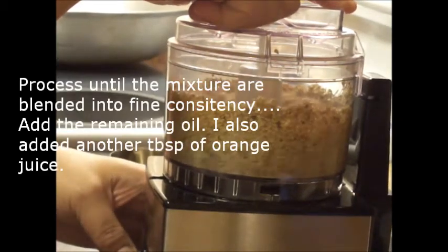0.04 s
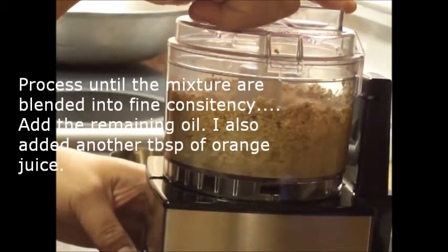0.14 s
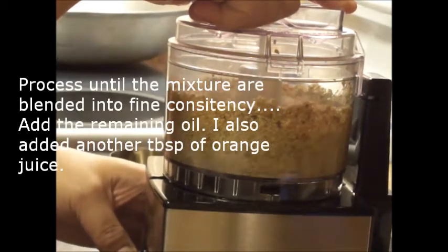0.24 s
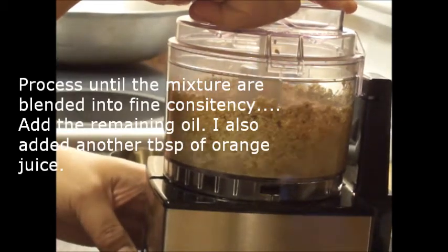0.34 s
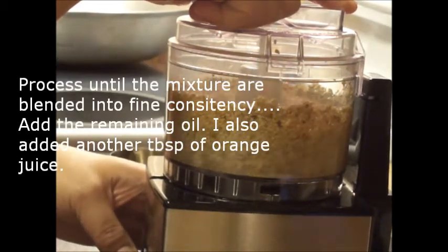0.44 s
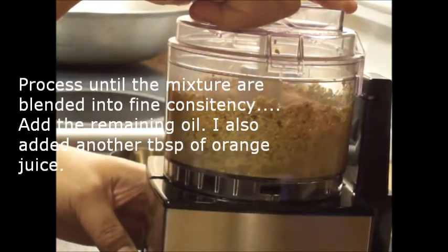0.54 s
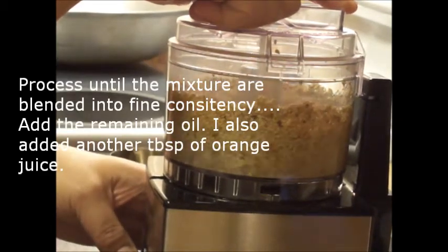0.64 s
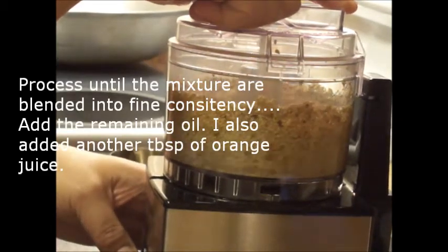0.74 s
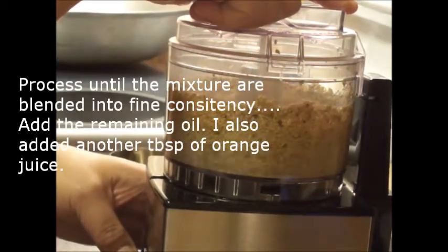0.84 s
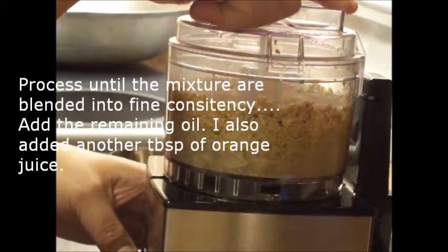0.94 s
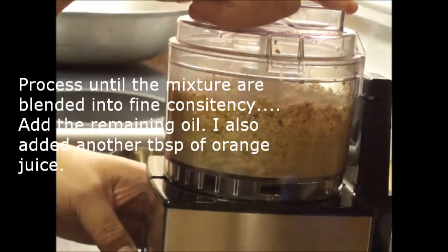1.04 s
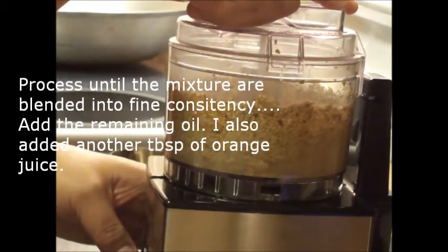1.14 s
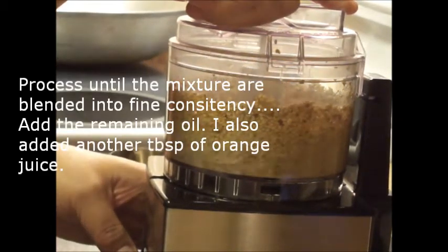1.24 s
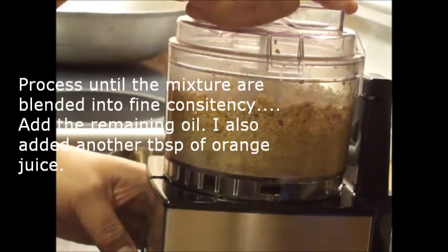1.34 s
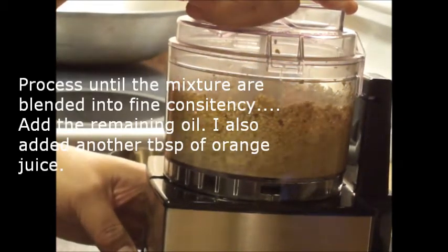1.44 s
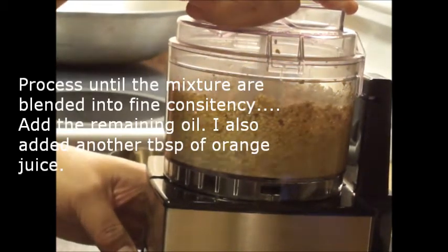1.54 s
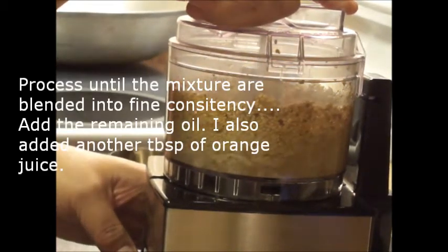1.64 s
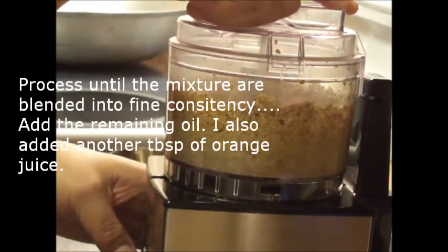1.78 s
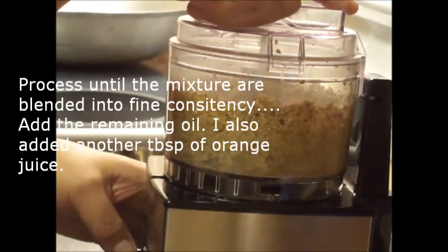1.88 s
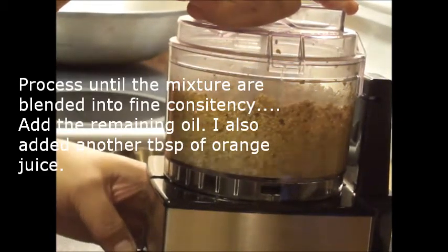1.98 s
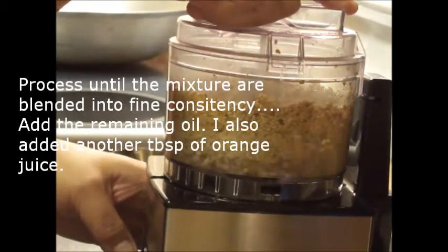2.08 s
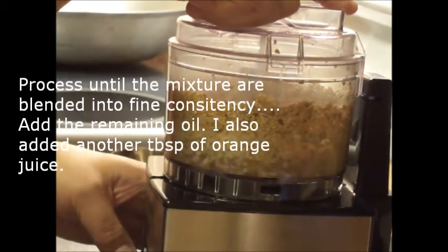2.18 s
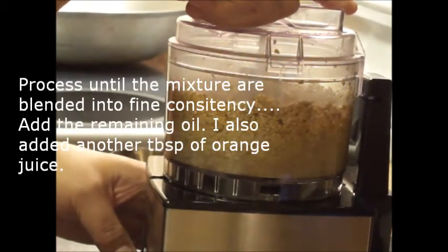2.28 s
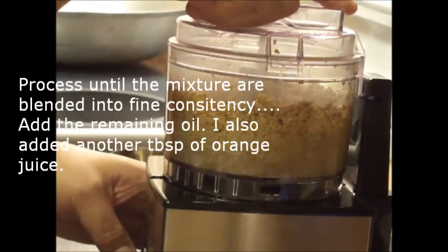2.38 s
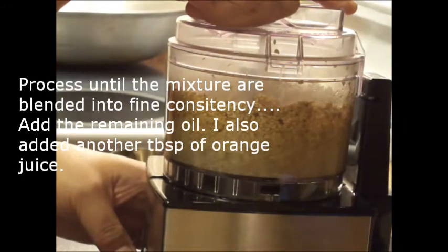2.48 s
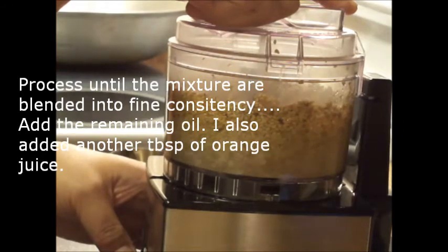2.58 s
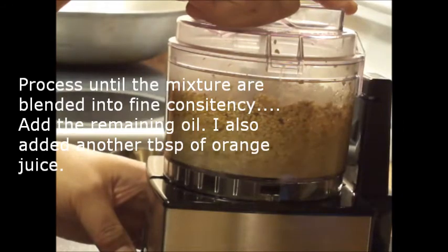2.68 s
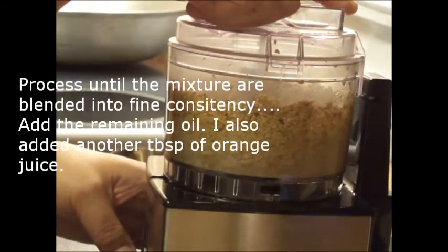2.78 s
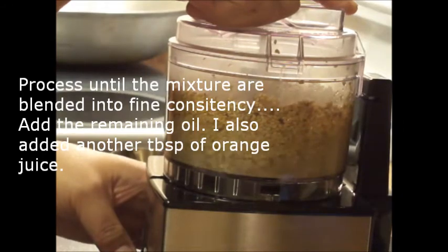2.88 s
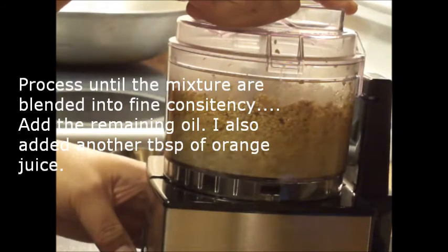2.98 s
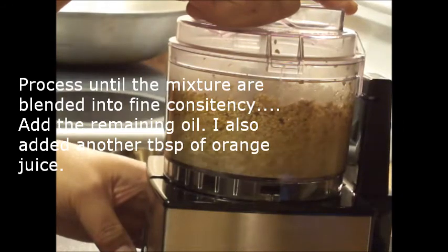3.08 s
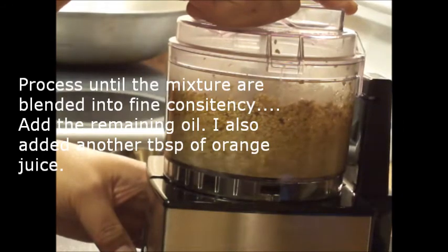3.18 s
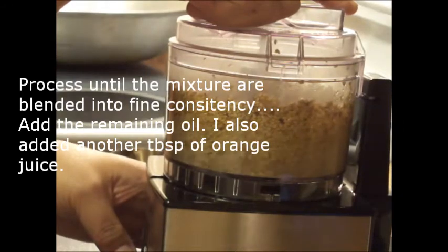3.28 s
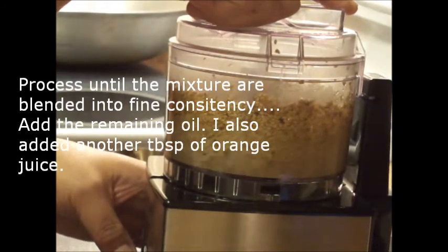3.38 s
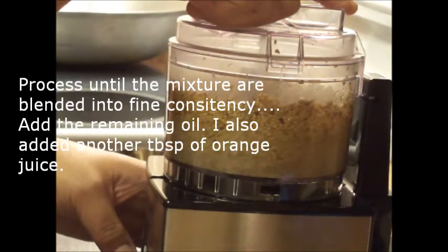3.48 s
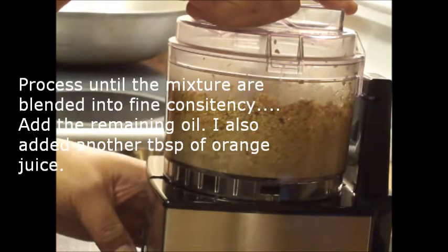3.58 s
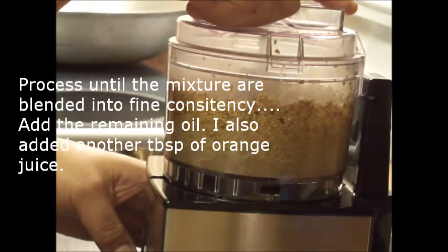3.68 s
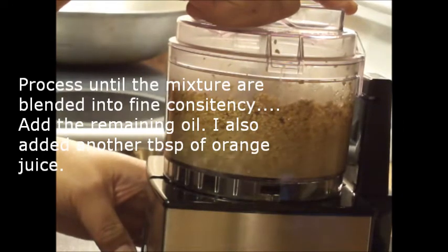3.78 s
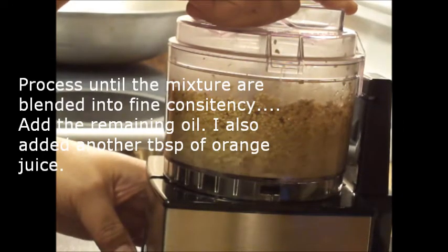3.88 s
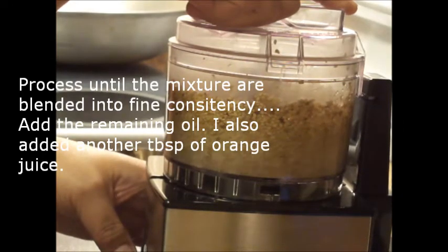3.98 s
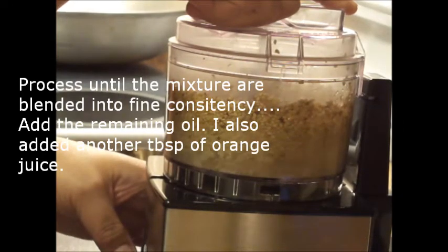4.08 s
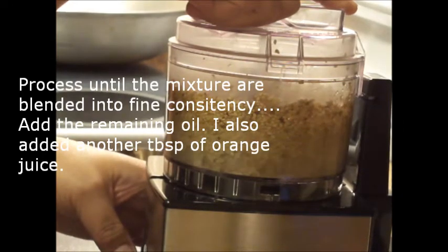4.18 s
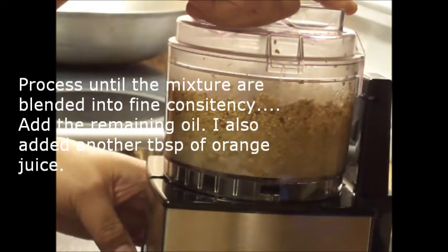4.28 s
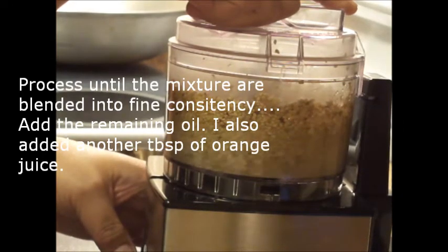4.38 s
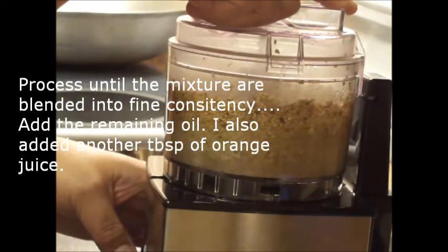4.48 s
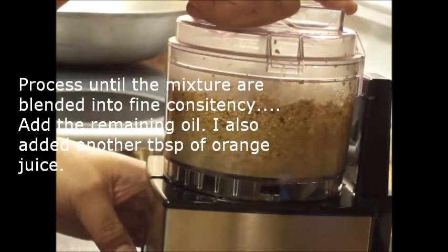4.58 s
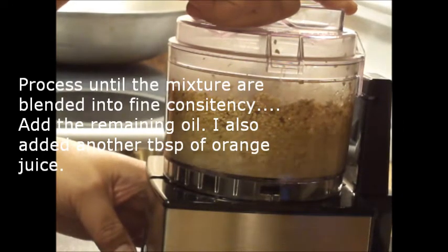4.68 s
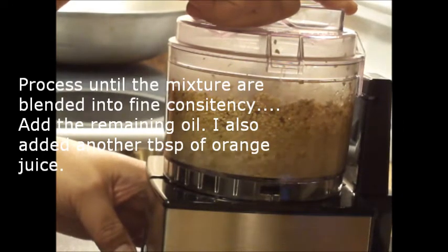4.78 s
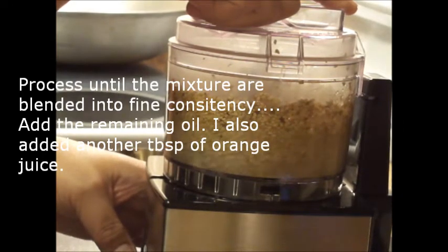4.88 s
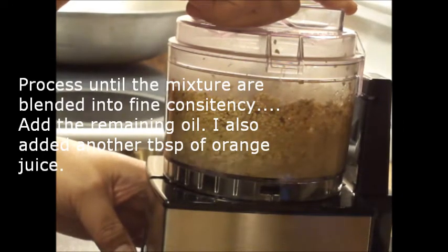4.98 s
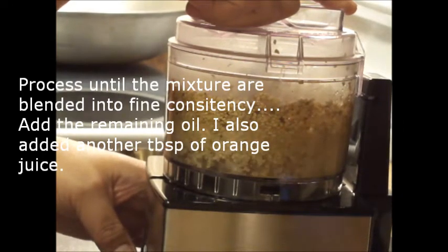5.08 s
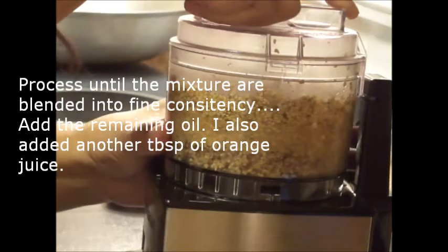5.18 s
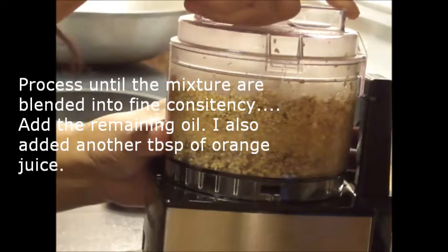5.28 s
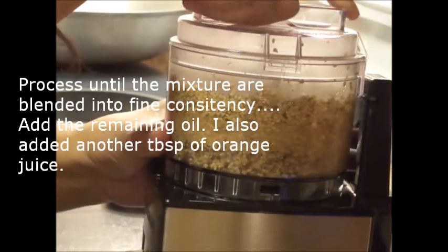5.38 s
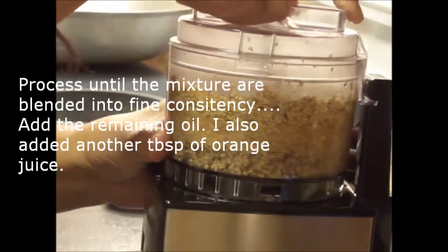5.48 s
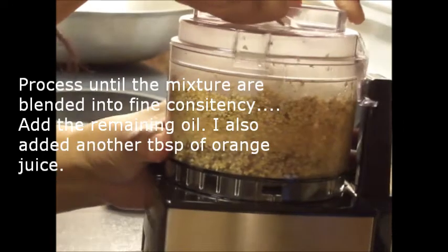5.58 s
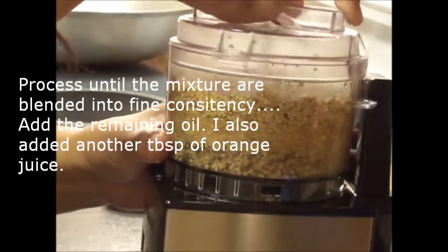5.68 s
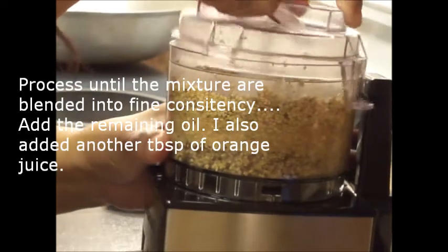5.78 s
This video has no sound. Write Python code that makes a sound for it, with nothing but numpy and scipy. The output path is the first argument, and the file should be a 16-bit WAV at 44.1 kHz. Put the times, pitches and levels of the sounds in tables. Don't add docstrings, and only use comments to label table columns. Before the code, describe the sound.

A mains-powered chopper whirs and crunches through dry seeds on a counter, throbbing and crackling irregularly. A brief run-down, a sharp switch click, then a second burst, strained at first, then faster, then slightly lower, all sinking gradually in level. A tiny silent gap follows, then quiet room hiss, light plastic ticks and a hard lid clack with a short rattle. Close, thin in the bass, with slight indoor reflections.

```python
import sys
import numpy as np
from scipy import signal
from scipy.fft import rfft, irfft, next_fast_len
from scipy.io import wavfile
from scipy.ndimage import map_coordinates

SR = 44100
rng = np.random.default_rng(int(sys.argv[2]) if len(sys.argv) > 2 else 0)


def ratio_of_db(decibels):
    return 10 ** (np.asarray(decibels, float) / 20)


def materialize(psi):
    bounded = np.clip(np.atleast_2d(psi).T, -1, 1)
    quanta = np.round(bounded * 32767).astype(np.int16)
    wavfile.write(sys.argv[1], SR, quanta)


N = 257103
FADE_END_S, CUT_S = 5.226, 5.243
FREE_SPEED = 145

# [s, 1/s].
WORKING_SPEED = [(0, 143.2), (2, 144), (2.25, 144), (2.32, 126), (2.5, 124), (2.64, 123.5), (2.7, 133),
                 (2.92, 137.8), (3.3, 139), (3.6, 138.5), (4.0, 133.5), (4.3, 132.6), (5, 132.6)]


def unit(x):
    return x / np.sqrt(np.mean(x ** 2) + 1e-20)


def along(points, hz):
    f, v = np.transpose(points)
    return np.interp(np.log(hz + 1), np.log(f + 1), v)


def curves(rows):
    s, *cols = np.transpose(rows)
    return [np.interp(np.arange(N) / SR, s, c) for c in cols]


def wobble(rate):
    knots = rng.standard_normal(int(N * rate / SR) + 4)
    return map_coordinates(knots, [np.arange(N) * rate / SR])


def filtered(x, response):
    m = next_fast_len(N + SR // 2)
    return irfft(rfft(x, m) * response(np.fft.rfftfreq(m, 1 / SR)), m)[..., :N]


def coloured(x, spectrum):
    return unit(filtered(x, lambda hz: ratio_of_db(along(spectrum, hz))))


def modes(table):
    return lambda f: 1 + sum(ratio_of_db(db) * 1j * f * w / (c * c - f * f + 1j * f * w) for c, w, db in table)


def drive():
    # [s, s].
    switch = [
        (-2, 1.98),
        (2.319, 5.02),
    ]
    # [s, dB].
    seed_load = [(0, -41), (.3, -40.5), (1, -41), (1.9, -41), (2.45, -38.5), (2.9, -39.5), (3.4, -39.5),
                 (4, -39.5), (4.5, -37.5), (5, -37)]
    spin_up_s, coast_s, friction = .055, .25, .41
    t = np.arange(N) / SR
    share, powered = np.zeros(N), np.zeros(N, bool)
    for on, off in switch:
        up, down = np.clip(t - on, 0, None), np.clip(t - off, 0, None)
        rise = 1 - np.exp(-up / spin_up_s)
        share += rise * np.clip((1 + friction) * np.exp(-down / coast_s) - friction, 0, 1)
        powered |= (t >= on) & (t < off)
    lag = 1 - share
    speed = share * curves(WORKING_SPEED)[0]
    fade_db = 20 * np.log10(np.clip(1 - t / 5.297, 1e-5, 1))
    loss_db = np.where(powered, 22.5, 41) * lag ** 2.59
    grind_db = curves(seed_load)[0] + fade_db - loss_db
    strain_db = np.where(powered, 6, 5.5) * np.tanh((1 - speed / FREE_SPEED) / .18)
    whine_db = -5 + strain_db - 32 * lag ** 4
    rumble_db = -13 + np.where(powered, 12.5, 5.5) * lag
    return speed, grind_db, whine_db, rumble_db


def jams():
    # [s, dB].
    early = [(0.0018, 5.5), (0.0218, 7.5), (0.029, 5.4), (0.0574, 4.1), (0.0732, 5.5), (0.0893, 6.5),
             (0.1082, 7.0), (0.1161, 4.4), (0.1229, 5.0), (0.1556, 5.8), (0.1726, 8.0), (0.1866, 5.9),
             (0.1925, 9.0), (0.2059, 5.5), (0.2224, 6.3), (0.2351, 9.2), (0.241, 4.2), (0.2481, 3.9),
             (0.2565, 7.0), (0.2753, 3.9), (0.2875, 6.4), (0.3052, 4.4), (0.3107, 4.8), (0.3243, 7.0),
             (0.3544, 5.2), (0.3673, 7.0), (0.3882, 7.9), (0.4016, 8.5), (0.4077, 6.9), (0.451, 7.1),
             (0.458, 6.1), (0.4719, 9.7), (0.4909, 4.3), (0.5016, 4.8), (0.5068, 5.0), (0.5215, 5.4),
             (0.5281, 5.3), (0.5358, 6.8), (0.5413, 5.6), (0.5698, 5.7), (0.6052, 5.6), (0.6243, 7.9),
             (0.6673, 4.5), (0.6884, 9.3), (0.7084, 4.5), (0.7234, 8.4), (0.7313, 5.7), (0.7372, 5.0),
             (0.751, 3.9), (0.7721, 8.2), (0.7812, 3.9), (0.8052, 5.6), (0.824, 9.1), (0.8342, 3.9),
             (0.8392, 4.1), (0.8551, 3.9), (0.8737, 7.9), (0.8923, 4.2)]
    late = [(0.9218, 6.8), (0.9567, 6.1), (1.0057, 5.8), (1.0272, 4.7), (1.034, 4.8), (1.042, 4.7),
            (1.0707, 5.2), (1.0821, 5.1), (1.1388, 5.8), (1.156, 5.0), (1.1728, 5.4), (1.2215, 6.9),
            (1.2392, 5.5), (1.256, 8.4), (1.2762, 4.7), (1.2839, 7.6), (1.2907, 5.3), (1.2984, 4.9),
            (1.3399, 4.8), (1.4168, 5.0), (1.4365, 5.7), (1.4569, 5.1), (1.4712, 6.1), (1.4925, 7.4),
            (1.5039, 6.1), (1.5118, 5.1), (1.5206, 6.9), (1.5293, 4.8), (1.5406, 7.7), (1.5546, 7.5),
            (1.6161, 5.2), (1.6245, 6.0), (1.6549, 4.8), (1.6669, 5.8), (1.6896, 5.4), (1.7007, 6.2),
            (1.7063, 5.1), (1.7181, 6.8), (1.7544, 8.8), (1.763, 6.7), (1.7887, 9.3), (1.7968, 7.7),
            (1.8029, 5.0), (1.8229, 5.2), (1.8501, 5.8), (1.8578, 4.9), (1.8714, 6.3), (1.8925, 6.2),
            (1.9, 5.7), (1.9247, 7.7), (1.9336, 5.1), (1.9417, 4.9), (1.9546, 5.8), (1.971, 8.0),
            (1.9828, 6.3), (1.9959, 6.9), (2.0039, 7.2), (2.0122, 7.5)]
    again = [(2.4224, 8.7), (2.4315, 7.4), (2.4374, 6.7), (2.4585, 10.3), (2.4744, 8.0), (2.4943, 7.1),
             (2.5043, 6.6), (2.5229, 4.3), (2.5374, 7.2), (2.549, 5.3), (2.5746, 6.9), (2.5887, 4.8),
             (2.615, 4.9), (2.654, 6.4), (2.676, 6.7), (2.6844, 4.2), (2.6909, 5.8), (2.7009, 6.2),
             (2.7075, 10.1), (2.7234, 4.4), (2.7374, 4.6), (2.7526, 7.7), (2.7748, 6.4), (2.8256, 4.2),
             (2.8494, 5.4), (2.8717, 5.9), (2.9188, 4.1), (2.9238, 5.7), (2.9372, 5.5), (2.9451, 4.2),
             (2.9499, 5.0), (2.9574, 7.9), (2.9798, 6.1), (2.9887, 6.0), (2.9946, 5.1), (3.0009, 7.5),
             (3.0227, 9.2), (3.0673, 4.5), (3.09, 7.4), (3.0948, 4.9), (3.1612, 4.4), (3.1694, 4.3),
             (3.2395, 6.1), (3.2551, 4.2), (3.2619, 6.2), (3.2678, 6.2), (3.2728, 4.1), (3.29, 5.2),
             (3.3188, 4.6), (3.3263, 5.1), (3.3333, 8.3), (3.3383, 5.2), (3.356, 7.5), (3.3696, 4.1),
             (3.4145, 4.4), (3.4281, 5.1), (3.4336, 5.1), (3.4549, 5.3)]
    last = [(3.5209, 5.5), (3.5381, 6.7), (3.5732, 6.1), (3.6036, 7.6), (3.6524, 5.6), (3.6705, 5.7),
            (3.6998, 5.0), (3.7073, 7.1), (3.7224, 5.6), (3.7655, 5.4), (3.7839, 5.2), (3.8324, 5.1),
            (3.8546, 5.8), (3.8689, 6.6), (3.9215, 9.1), (3.9367, 8.7), (3.9669, 6.2), (3.9905, 6.1),
            (4.0238, 11.8), (4.042, 5.1), (4.0918, 5.3), (4.1102, 5.6), (4.1546, 5.7), (4.1844, 5.6),
            (4.1918, 9.2), (4.2014, 6.6), (4.2728, 7.0), (4.2912, 6.1), (4.344, 6.8), (4.3485, 5.6),
            (4.3553, 5.2), (4.4351, 5.9), (4.456, 8.5), (4.4873, 5.2), (4.5023, 5.2), (4.5234, 6.8),
            (4.5624, 5.6), (4.607, 6.0), (4.6302, 6.8), (4.6392, 7.1), (4.6458, 5.4), (4.6549, 6.4),
            (4.6728, 5.7), (4.7574, 8.7), (4.7866, 6.2), (4.8032, 10.0), (4.8093, 6.0), (4.8184, 6.2),
            (4.8404, 8.4), (4.8721, 7.4), (4.9063, 7.3), (4.9172, 6.7), (4.9222, 5.2), (4.9404, 5.4),
            (4.9556, 5.6), (4.9744, 10.1), (4.9828, 7.0), (4.99, 8.1)]
    jolt_gain, half_s = 1.5, 0.0015
    bump_db, t = np.zeros(N), np.arange(N) / SR
    for s, db in [*early, *late, *again, *last]:
        near = slice(max(round(s * SR) - 300, 0), round(s * SR) + 300)
        bump_db[near] += jolt_gain * db * np.exp(-((t[near] - s) / half_s) ** 2)
    return ratio_of_db(bump_db)


def processor():
    # [Hz, Hz, dB].
    case_modes = [(445, 53, -3), (572, 45, 1.5), (869, 52, 4), (1547, 75, 2), (1763.4, 28.6, 8.5),
                  (1966, 250, 3), (2110, 24, 4.5), (2250, 110, -9), (2687, 67, 1), (3130, 140, -4.5),
                  (3420, 160, 1.5), (3590, 40, -0.5), (3650, 120, -2), (5090, 100, -2), (5570, 71, -4.5),
                  (9310, 110, -16)]
    # [Hz, Hz, share].
    case_dips = [(1646, 32, 0.08), (2197, 74, 0.47), (2560, 83, 0.29), (3740, 52, 0.2)]
    # [1, dB].
    tooth_tones = [(1, -1.5), (2, -1.5), (3, -7.5)]
    # [s, dB].
    sing_level = [(0, -28), (2.0, -28), (2.05, -40), (2.62, -40), (2.72, -13), (3.3, -14), (4, -16),
                  (4.9, -19), (5.02, -40)]
    # [Hz, dB per Hz].
    grind_colour = [(530, -32.5), (900, -28), (978, -17.5), (1270, -13), (1530, -7.5), (1660, -2),
                    (1770, -4.5), (2540, -6), (3580, -2.5), (4490, -5.5), (5650, -9.5), (6330, -11.5),
                    (10700, -18), (14000, -24), (22000, -120)]
    # [Hz, dB per Hz].
    rumble_colour = [(24, -83), (40, -40), (154, -30), (188, -10.5), (350, -14), (568, -7), (713, -8),
                     (830, -8.5), (1160, -10), (1500, -1.5), (1950, -51), (3300, -120)]
    # [1, dB].
    shake_lines = [(4 / 3, -14), (10 / 3, -16)]

    def case(f):
        dips = 1 - sum(depth / (1 + ((f - c) / w) ** 2) for c, w, depth in case_dips)
        return modes(case_modes)(f) * dips

    speed, grind_db, whine_db, rumble_db = drive()
    turn = 2 * np.pi * np.cumsum(speed * (1 + .002 * wobble(6))) / SR
    mains = 2 * np.pi * 60 * np.arange(N) / SR + np.pi
    mesh = 38 / 3 * turn

    load_db = 4 * np.cos(mains) + 0.97 * np.cos(2 * mains)
    load_db += 3 * np.cos(turn) + 3 * np.cos(turn / 3) + 4.8 * np.cos(2 * turn / 3)
    slip = 0.82 * np.sin(mains) + 0.5 * wobble(60) + 0.75 * wobble(400)
    slip += 1.45 * np.clip(1 - speed / 125, 0, 1) ** .5 * wobble(250)
    teeth = sum(ratio_of_db(db) * np.sin(k * (mesh + slip)) for k, db in tooth_tones)
    push_db = .45 * load_db + 1.4 * wobble(110) + 2.2 * wobble(300)
    force = ratio_of_db(12 * np.tanh(push_db / 12))
    jolt = jams() ** (speed / curves(WORKING_SPEED)[0]) ** 4
    sing_phase = mesh + .7 * np.sin(mains) + .2 * wobble(30)
    sing = ratio_of_db(curves(sing_level)[0] + 1.5 * wobble(12)) * np.sin(sing_phase)
    whine = unit(filtered(jolt * force * teeth, case)) + 1.4 * sing

    cracks = (rng.random(N) < 700 / SR) * rng.standard_normal(N)
    beat = ratio_of_db(0.2 * np.cos(mains) + 1.3 * np.cos(turn) + 0.51 * wobble(30) + 1.01 * wobble(200))
    seeds = jolt ** 0.25 * beat * rng.standard_normal(N) + 0.24 * unit(cracks)
    ringing = np.clip(speed / FREE_SPEED, 0, 1) ** 2
    grind = coloured(filtered(ringing * seeds, case), grind_colour)
    grind += 0.75 * (1 - ringing) * coloured(seeds, grind_colour)

    throb = ratio_of_db(2.0 * np.cos(mains) + 1.3 * wobble(18))
    rumble = coloured(filtered(throb * rng.standard_normal(N), case), rumble_colour)
    shake = sum(ratio_of_db(db - 0.5 + 0.97 * wobble(18)) * np.sin(k * turn) for k, db in shake_lines)
    rumble += (speed / speed.max()) ** 12 * shake
    return ratio_of_db(grind_db) * (grind + ratio_of_db(whine_db) * whine + ratio_of_db(rumble_db) * rumble)


def kitchen(x):
    # [Hz, s].
    decay = [(200, 0.52), (1000, 0.45), (3000, 0.32), (10000, 0.068)]
    hz, t, z = signal.stft(rng.standard_normal(SR // 2), SR, nperseg=256)
    fall = ratio_of_db(-60 * t / along(decay, hz)[:, None])
    tail = signal.istft(z * fall, SR, nperseg=256)[1]
    return signal.fftconvolve(np.pad(x, (200, 0)), tail / np.linalg.norm(tail))[:N]


def hush():
    # [Hz, dB per Hz].
    air_colour = [(18, -41.5), (30, -11.5), (195, -7), (261, -7), (397, -7.5), (521, -4.5), (717, -13.5),
                  (1060, -9.5), (1360, -12.5), (2020, -14.5), (4770, -22), (7990, -22.5), (10700, -26),
                  (14000, -63), (22000, -120)]
    # [Hz, dB rms].
    whistle = [(7881, -100)]
    t = np.arange(N) / SR
    air = ratio_of_db(-78 + 1.4 * wobble(9.2)) * coloured(rng.standard_normal(N), air_colour)
    tone = sum(ratio_of_db(db + 5 + 1.5 * wobble(60)) * np.sin(2 * np.pi * f * t) for f, db in whistle)
    fade = np.where(t < CUT_S, np.clip(1 - t / FADE_END_S, 0, 1), 1)
    return fade * (air + tone)


def clicks():
    # [s, dB, Hz, octaves, s].
    contacts = [(2.322, -43.5, 1200, 1.5, 0.025), (2.342, -31.5, 3460, 0.31, 0.023),
                (2.341, -50, 1510, 1.9, 0.025), (2.355, -42, 850, .2, .05),
                (5.296, -59.5, 910, 0.42, 0.083), (5.301, -56, 1290, 1, 0.043),
                (5.477, -54.5, 6200, 0.13, 0.027), (5.479, -57, 4000, 0.89, 0.013),
                (5.490, -56, 850, 0.14, 0.055), (5.49, -54.5, 1800, 0.58, 0.034),
                (5.578, -53, 2340, 0.73, 0.066), (5.591, -38, 1430, 1.4, 0.11),
                (5.598, -24, 1260, 0.55, 0.024), (5.597, -27.5, 4160, 0.77, 0.038),
                (5.595, -34, 402, 0.26, 0.045), (5.607, -39, 650, 0.3, 0.12),
                (5.606, -25, 2670, 0.43, 0.017), (5.606, -39, 1670, 1.25, 0.37),
                (5.636, -24, 2710, 0.3, 0.011), (5.64, -42, 2440, 0.67, 0.24),
                (5.651, -39, 2700, 0.1, 0.025), (5.672, -39, 2680, 0.1, 0.025),
                (5.692, -44, 2650, 0.15, 0.025), (5.709, -47, 2650, 0.15, 0.03),
                (5.64, -44, 3950, 0.1, 0.1), (5.7, -48, 1800, .1, .04), (5.738, -50, 950, .2, .03),
                (5.611, -48, 240, 0.32, 0.094), (5.66, -49, 626, .4, 0.13), (5.812, -60, 450, 0.48, 0.035),
                (2.24, -65, 1110, 0.97, 0.037)]
    # [Hz, Hz, dB].
    lid_modes = [(590, 180, -7), (1250, 500, -5), (2220, 200, -8), (2690, 160, 2), (3250, 160, 1),
                 (3980, 250, -1), (6420, 400, 1), (7770, 400, -6)]
    out, t = np.zeros(N + SR), np.arange(SR // 4) / SR
    hz = np.fft.rfftfreq(len(t), 1 / SR) + 1
    rattle = wobble(180)[:len(t)]
    for s, db, centre_hz, octaves, t60 in contacts:
        band = np.exp(-.5 * (np.log2(hz / centre_hz) / octaves) ** 2)
        burst = unit(irfft(rfft(rng.standard_normal(len(t))) * band, len(t)))
        burst = burst * ratio_of_db(3.6 * np.tanh(t / 0.021) * rattle)
        fall = ratio_of_db(db - 8 - 60 * t / t60) * (1 - np.exp(-t / 0.00069))
        click = fall * burst
        out[round(s * SR):][:len(t)] += click * np.linalg.norm(fall) / np.linalg.norm(click)
    return filtered(out[:N], modes(lid_modes))


def scene():
    lid, motor = clicks(), processor()
    room = kitchen(ratio_of_db(-15) * motor + ratio_of_db(-14) * lid)
    return (motor + lid + room + hush())[None]


def band_limit(x):
    return signal.sosfilt(signal.butter(12, 10890, fs=SR, output="sos"), x)


def record(dry):
    t = np.arange(N) / SR
    thin = filtered(dry, lambda hz: (1j * hz / (120 + 1j * hz)) ** 2)
    gap = np.clip((FADE_END_S - t) / 0.037, 0, 1) + np.clip((t - CUT_S) / 0.028, 0, 1)
    return band_limit(thin * gap)


dry = scene()
out = record(dry)
materialize(out)
```